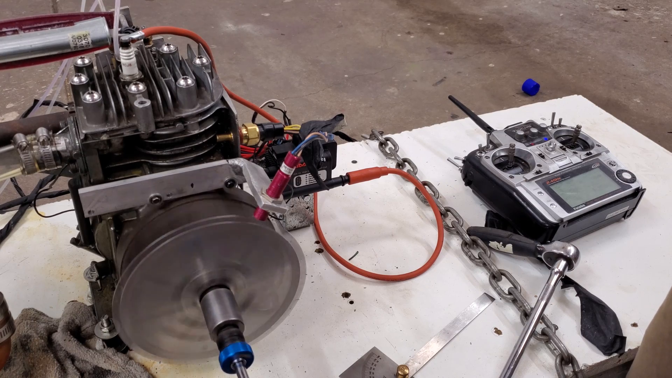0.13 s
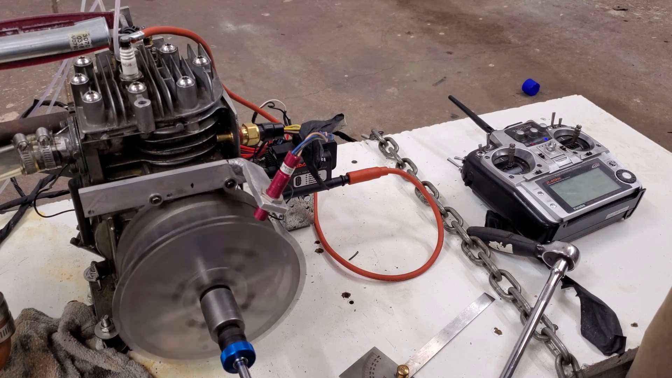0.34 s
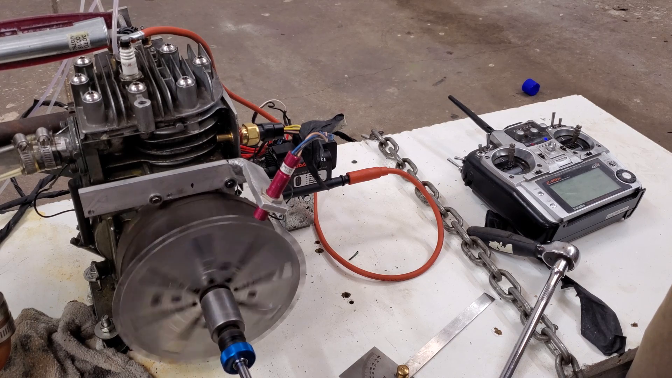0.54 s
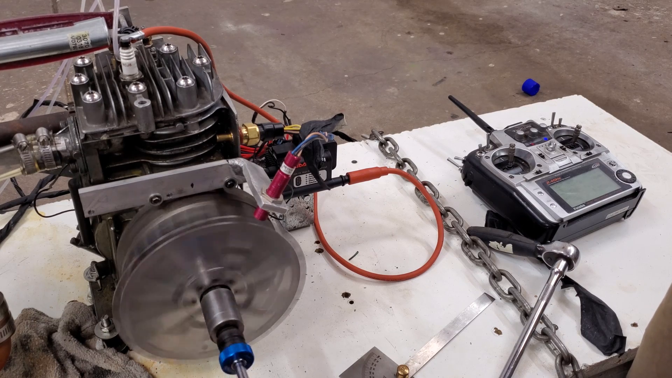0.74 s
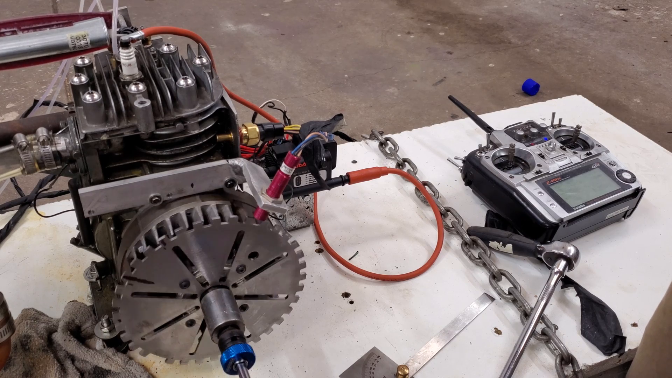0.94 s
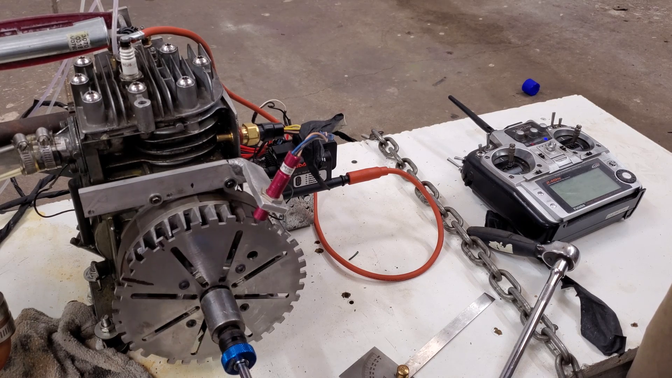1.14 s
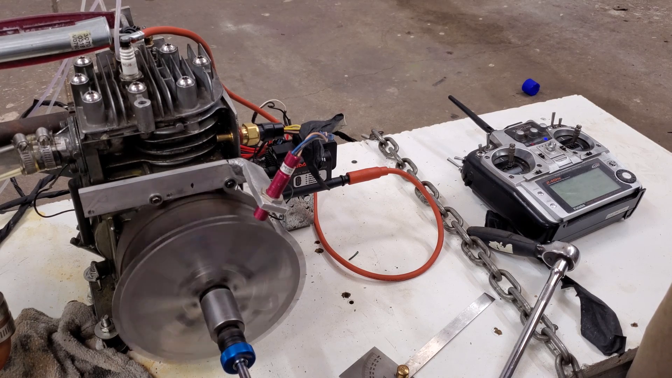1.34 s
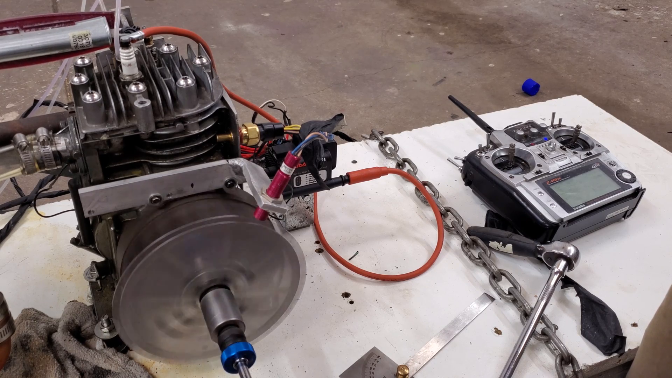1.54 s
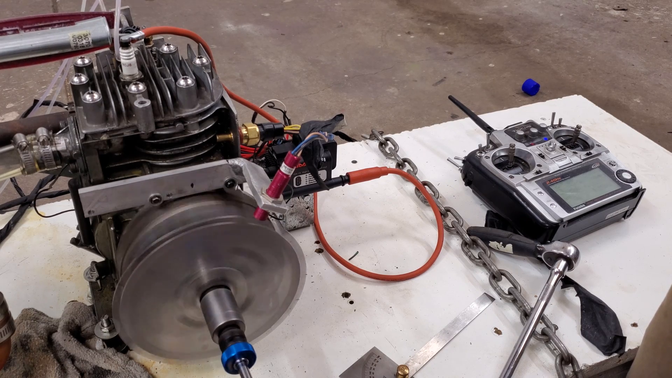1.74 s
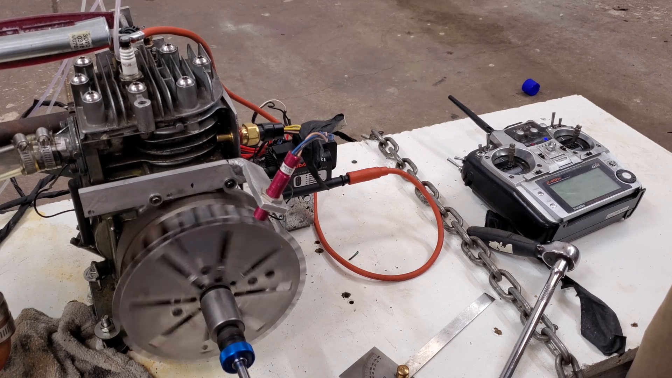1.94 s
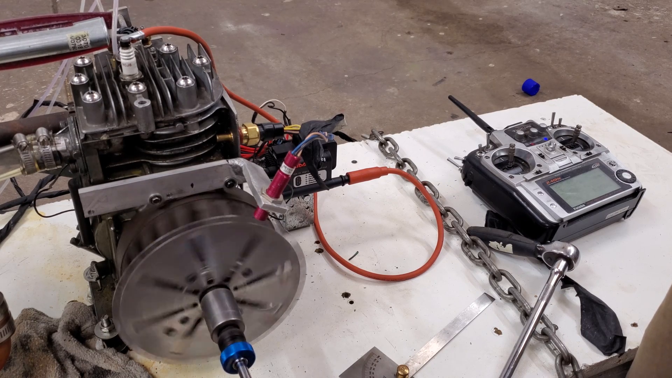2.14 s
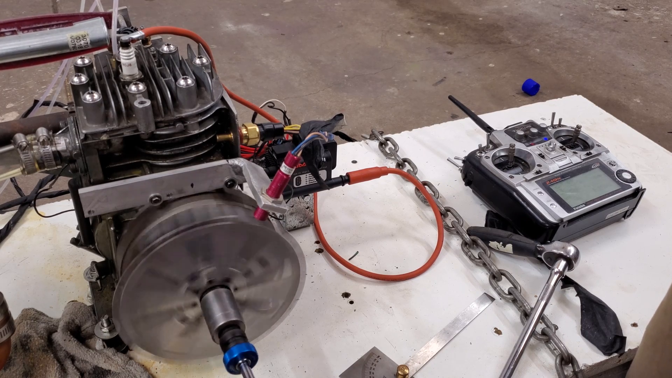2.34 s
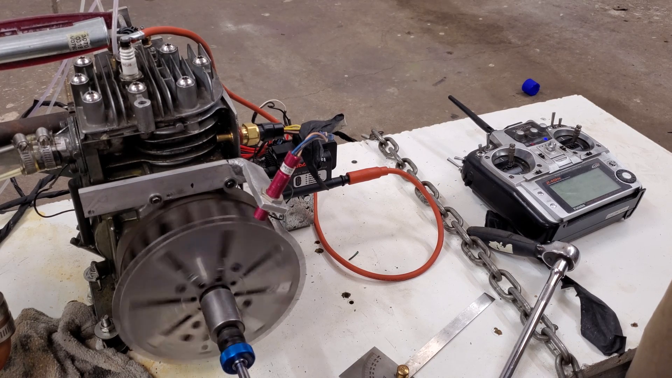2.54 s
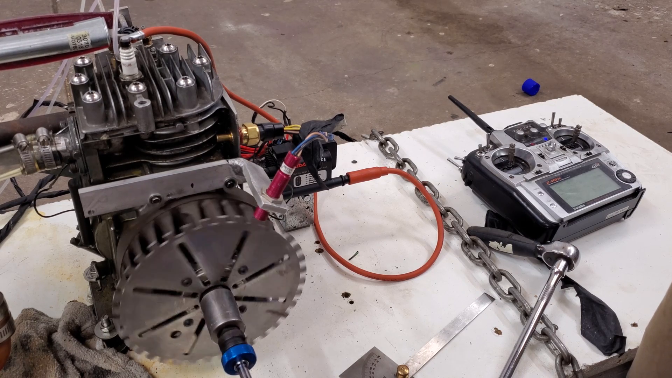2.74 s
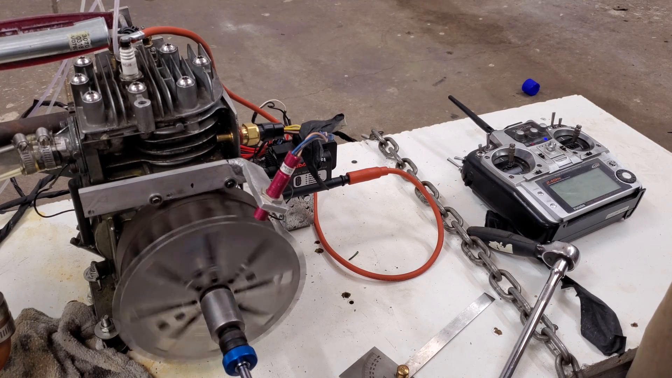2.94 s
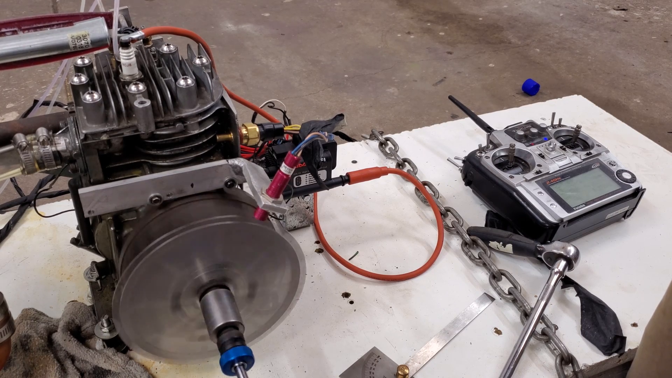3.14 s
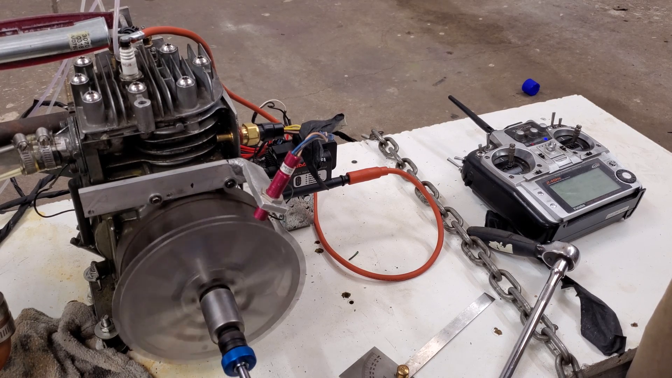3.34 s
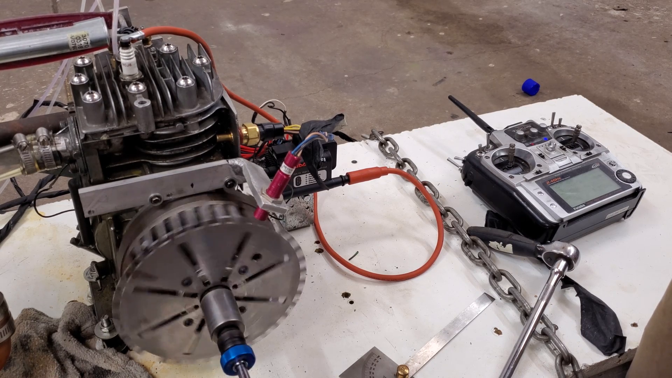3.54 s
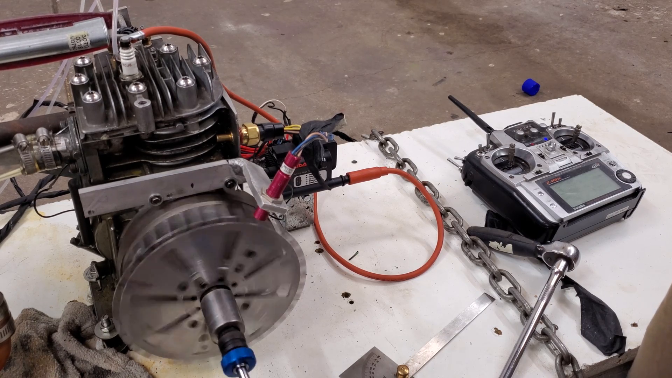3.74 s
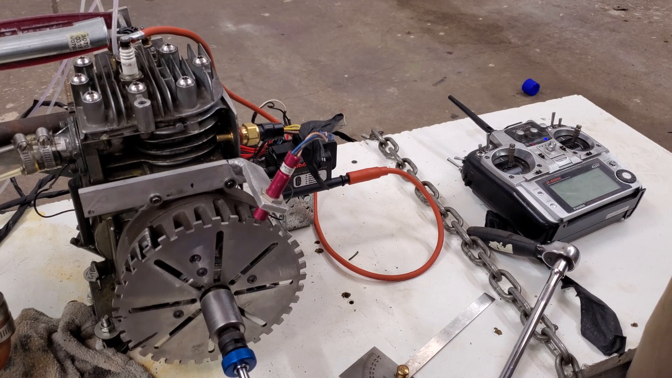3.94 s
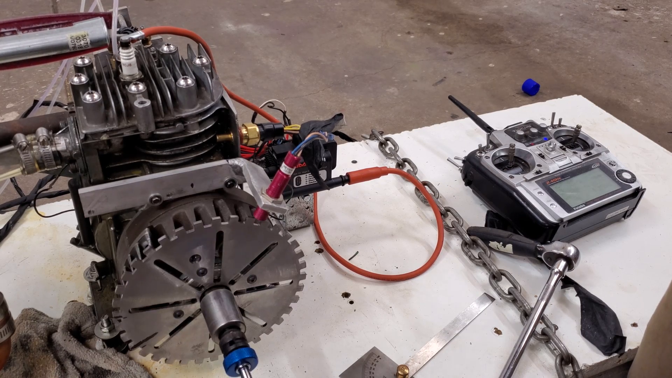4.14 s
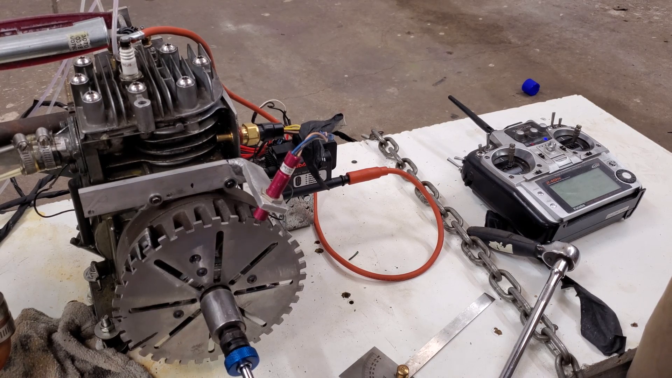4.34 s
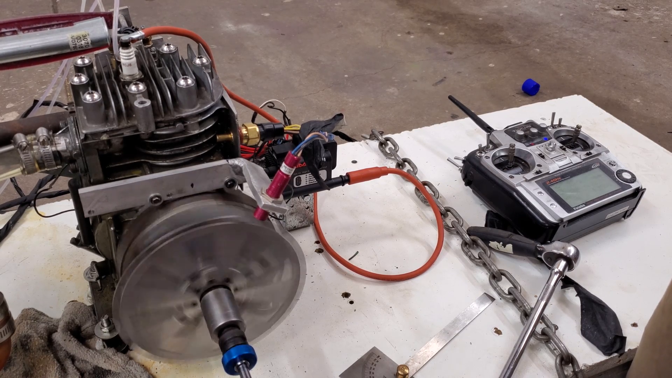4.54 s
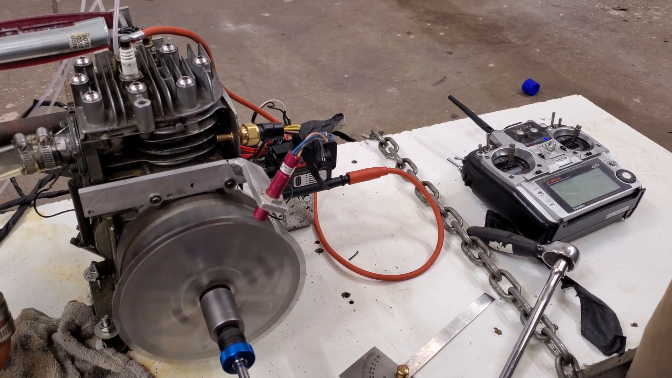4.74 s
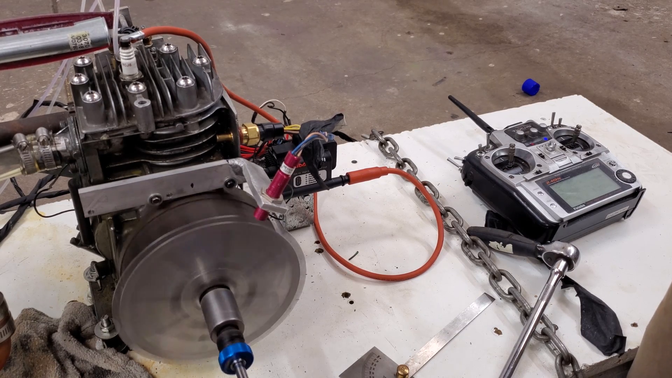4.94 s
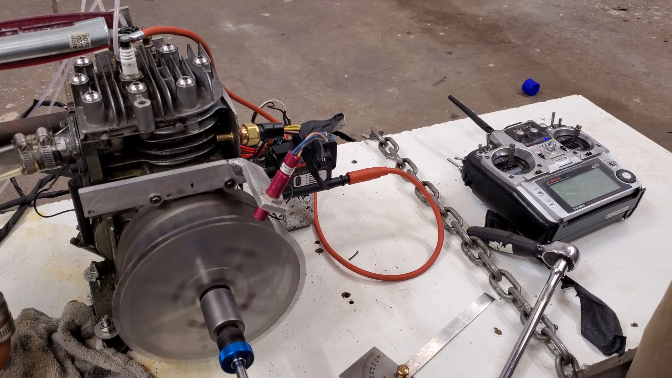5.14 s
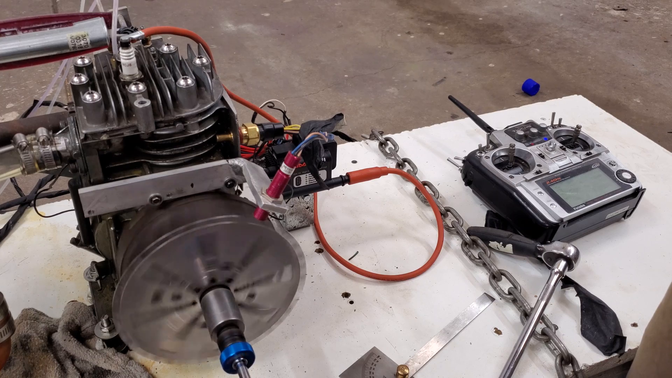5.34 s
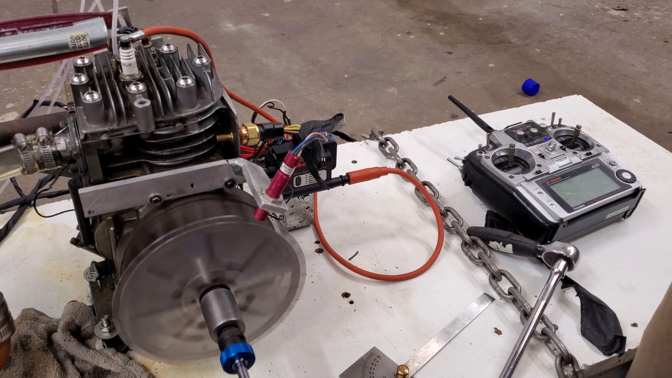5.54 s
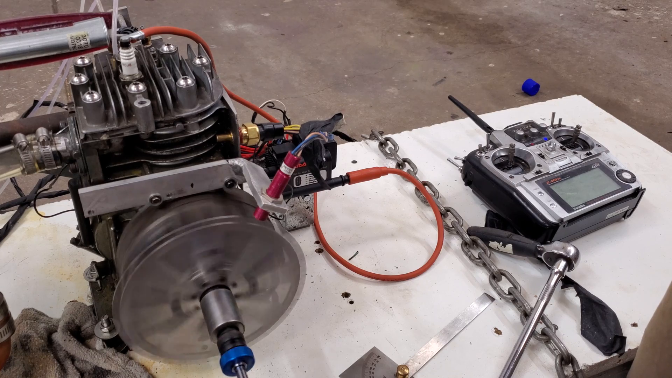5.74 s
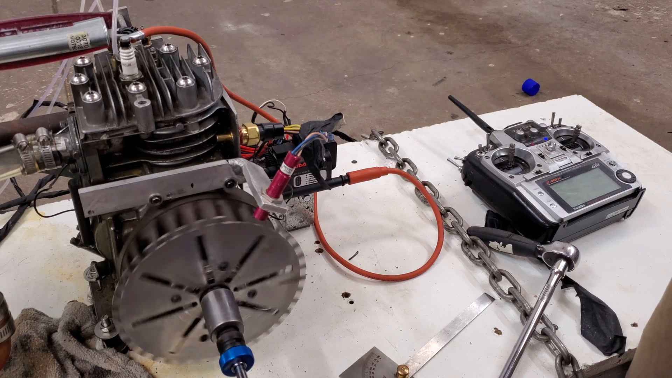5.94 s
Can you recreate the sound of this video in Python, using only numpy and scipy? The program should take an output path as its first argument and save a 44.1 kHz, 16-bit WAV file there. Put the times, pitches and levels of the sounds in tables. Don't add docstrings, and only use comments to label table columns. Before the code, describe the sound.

Close stereo phone recording in a workshop with slight room reverberation. A drill already grinding an engine slows with rattling and clacks, then three more pulls follow: a long hard one, a weaker one, a last hard one. Gears rasp, the motor whines, the piston thumps low, and loose metal ticks through each coast-down. The second and fourth bursts each hold one dull exhaust pop.

```python
import sys
import numpy as np
from scipy import signal
from scipy.fft import rfft, irfft, next_fast_len
from scipy.io import wavfile
from scipy.ndimage import uniform_filter1d, map_coordinates

SR = 44100
rng = np.random.default_rng(int(sys.argv[2]) if len(sys.argv) > 2 else 0)


def pcm_store(signal):
    levels = np.round(np.clip(np.atleast_2d(signal), -1, 1) * 32767)
    wavfile.write(sys.argv[1], SR, levels.astype(np.int16).T)


def gain_from_db(level_db):
    decades = np.asarray(level_db, float) / 20
    return 10 ** decades


N = 263718
T = np.arange(N) / SR


def unit(x):
    return x / np.sqrt(np.mean(x ** 2) + 1e-20)


def along(points, hz):
    point_hz, value = np.transpose(points)
    return np.interp(np.log(hz + 1), np.log(point_hz + 1), value)


def curves(rows):
    s, *columns = np.transpose(rows)
    return [np.interp(T, s, column) for column in columns]


def wobble(knots_per_s):
    coarse_s = T[::4]
    knots = rng.standard_normal(int(N * knots_per_s / SR) + 4)
    return unit(np.interp(T, coarse_s, map_coordinates(knots, [coarse_s * knots_per_s])))


def filtered(x, response):
    m = next_fast_len(N + SR // 8)
    return irfft(rfft(x, m) * response(np.fft.rfftfreq(m, 1 / SR)), m)[..., :N]


def resonance(f, centre_hz, width_hz):
    return 1j * f * width_hz / (centre_hz ** 2 - f * f + 1j * f * width_hz)


def modes(table):
    return lambda f: sum((-1) ** k * gain_from_db(db) * resonance(f, hz, width_hz)
                         for k, (hz, width_hz, db) in enumerate(table))


def pair(response, lumps_db):
    return unit(filtered(rng.standard_normal((2, N)) * gain_from_db(lumps_db), response))


def patchy(x, depth_db):
    z = signal.stft(x, nperseg=256)[2]
    field = uniform_filter1d(rng.standard_normal(z.shape[1:]), 4, 0)
    field = uniform_filter1d(field, 12, 1)
    return unit(signal.istft(z * gain_from_db(depth_db * unit(field)), nperseg=256)[1][:, :N])


def tone(rows, orders):
    hz, db = curves(rows)
    start_s, end_s = rows[0][0], rows[-1][0]
    on = np.interp(T, [start_s - .02, start_s, end_s, end_s + .02], [0, 1, 1, 0])
    phase = 2 * np.pi * np.cumsum(hz * (1 + .0025 * wobble(30))) / SR
    total = 0
    for multiple, level_db, flutter_db in orders:
        gain = np.sqrt(2) * gain_from_db(level_db + flutter_db * wobble(35))
        total = total + gain * np.sin(multiple * phase)
    return on * gain_from_db(db) * total


def glides(rows, rise_s):
    out = np.zeros(N + SR)
    for s, length_s, from_hz, to_hz, db in rows:
        t = np.arange(round((length_s + 3 * rise_s) * SR)) / SR
        hz = from_hz + (to_hz - from_hz) * np.clip(t / length_s, 0, 1)
        shape = np.clip(t / rise_s, 0, 1) * np.exp(-np.clip(t - length_s, 0, None) / rise_s)
        sine = np.sin(2 * np.pi * np.cumsum(hz) / SR)
        out[round(s * SR):][:len(t)] += np.sqrt(2) * gain_from_db(db) * shape * sine
    return out[:N]


# (start_s, effort_db, airflow_over_effort_db)
BURSTS = [
    [(0.0, -25, -1.5), (0.27, -29, -0.5), (0.35, -31, 2), (0.41, -34, 0), (0.496, -41, 4), (0.57, -43, 4),
     (0.64, -49.5, 3), (0.7, -57.5, -1)],
    [(0.938, -34.5, -13), (1.114, -24.5, -4), (1.26, -21.5, -5.5), (1.382, -22, -6), (1.438, -28, -1),
     (1.754, -23.5, -1.5), (1.936, -31.5, 1), (2.116, -37.5, 1), (2.374, -37, -2.5), (2.405, -46, 0),
     (2.5, -57.5, -1)],
    [(2.653, -45.5, 3), (2.748, -27.5, -9.5), (2.972, -31.5, 1.5), (3.176, -27.5, -1.5), (3.38, -29.5, 0.5),
     (3.42, -32.5, -1.5), (3.604, -35, -3), (3.824, -44.5, -1), (3.92, -57, -4)],
    [(4.18, -32, -3.5), (4.33, -28, -6), (4.44, -22, -4), (4.61, -20, -7), (4.776, -31.5, 2.5),
     (4.902, -23, -2.5), (5.24, -27.5, 1), (5.31, -33.5, 0), (5.72, -35, 0.5), (5.755, -42, -0.5),
     (5.86, -52.5, -0.5)],
]
STOP_DB_PER_S = [190, 160, 150, 75]


def drive():
    brake_db_per_s2 = 207
    out = np.zeros((3, N))
    for burst, stop_db_per_s in zip(BURSTS, STOP_DB_PER_S):
        start_s, end_s = burst[0][0], burst[-1][0]
        effort_db, air_db = curves(burst)
        late_s = (T - end_s).clip(0)
        effort_db = effort_db - (stop_db_per_s + brake_db_per_s2 * late_s) * late_s
        since_s = T - start_s + (start_s < .01)
        out = np.where(T >= start_s, [effort_db, air_db, since_s], out)
    return out


# (start_s, peak_db)
JERKS = [
    (0.372, -27.5),
    (0.949, -32),
    (2.664, -30.5),
    (4.184, -34.5),
]
# (from_s, to_s)
PULLING = [
    (-.1, 0.29),
    (1.17, 1.88),
    (2.9, 3.35),
    (4.42, 5.28),
]
# (centre_hz, width_hz, level_db)
HOUSING = [(2330, 800, 1.5), (3186, 353, 3), (4280, 330, -4), (1720, 810, -9.5), (6200, 890, -10.5)]
# (centre_hz, width_hz, level_db)
COGS = [(1977, 67, -19), (2194, 52, -17.5), (2357, 170, -8.5), (2544, 110, -13.5), (2970, 160, -8),
        (3224, 140, -13.5), (3486, 170, -7.5), (4480, 140, -17.5)]
# (centre_hz, width_hz, level_db)
CHUCK = [(680, 171, 3.5), (920, 180, 0.5), (1483, 183, -2), (410, 460, -5.5)]
# (centre_hz, width_hz, level_db)
COVER = [(5800, 400, -5), (8150, 800, 1), (9900, 400, -4), (11000, 450, -4), (12800, 400, -3),
         (14600, 400, -9)]
# (freq_hz, density_db)
FAN = [(2350, -19.5), (4000, -7), (4560, -7.5), (4830, -3.5), (6250, -3.5), (7250, -7.5), (8130, -3),
       (8370, -1.5), (8710, -4), (9270, -7.5), (11900, -8), (13100, -7.5), (15700, -13)]
# (centre_hz, width_hz, level_db)
STEEL = [(8220, 310, 0), (7860, 450, -4)]
# (start_s, shift_hz, level_db)
STEEL_LOAD = [(1.1, -100, 4), (1.2, 60, -5), (1.31, 0, 5), (1.42, 40, -8), (1.54, 79.5, 2),
              (1.66, -29.5, -0.5), (1.77, 59.5, 1), (1.9, 80, 0.5), (4.46, -150, 0.5), (4.61, -170, 1.5),
              (4.7, -39.5, -3.5), (5.12, -19.5, 2), (5.27, 79, -13)]


def gears():
    effort_db, air_db, since_s = drive()
    jerk_db_per_s = 503.5
    jerk = sum(gain_from_db(db - jerk_db_per_s * np.abs(T - s)) * (since_s < T - s + .016) for s, db in JERKS)
    pulled = uniform_filter1d(sum(1. * (T > a) * (T < b) for a, b in PULLING), size=5000)
    free = 1 - pulled
    fan_db = effort_db + air_db
    chatter_db = 0.38 * wobble(30) + 0.5 * wobble(70) + 0.84 * wobble(400) + 2.34 * wobble(3000)

    shell_lumps_db = chatter_db + 0.42 * wobble(17) + 2.5 * (1 - .6 * pulled) * wobble(80)
    housing = pair(modes(HOUSING), shell_lumps_db)
    impacts = rng.standard_normal((2, N)) * gain_from_db(chatter_db)
    struck = filtered(impacts, lambda f: np.array([[resonance(f, hz, width_hz)] for hz, width_hz, _ in COGS]))
    for (_, _, db), cog in zip(COGS, struck):
        housing = housing + gain_from_db(db) * unit(cog * gain_from_db(3 * wobble(30)))
    housing = (gain_from_db(effort_db) + jerk) * gain_from_db(-4) * housing

    growl = gain_from_db(-37 + 0.79 * (effort_db + 30) + 0.02 * air_db) + jerk
    chuck = pair(lambda f: modes(CHUCK)(f) * f / (f + 300), chatter_db + 1.37 * wobble(14))
    chuck = growl * gain_from_db(-3.0 + 0.5 * pulled) * chuck

    cover = patchy(pair(modes(COVER), chatter_db + 2.2 * wobble(120)), depth_db=3.0)
    cover = gain_from_db(fan_db - 2.5) * free * cover

    rattle_db = free * wobble(79)
    rush = pair(lambda f: gain_from_db(along(FAN, f)), 0.73 * chatter_db + 0.64 * wobble(40) + rattle_db)
    fan = gain_from_db(fan_db + 1.0 - 4 * free) * patchy(rush, depth_db=1.0)

    steel = gain_from_db(fan_db - 16 * free - 3) * pair(lambda f: modes(STEEL)(f) ** 2, 2.2 * wobble(60))
    shift_hz, load_db = curves(STEEL_LOAD)
    analytic = signal.hilbert(steel, next_fast_len(N))[:, :N]
    steel = gain_from_db(load_db) * np.real(analytic * np.exp(2j * np.pi * np.cumsum(shift_hz) / SR))
    return housing + chuck + fan + steel + cover


# (start_s, turns_hz, hum_db)
HUM_A = [(0.0, 305, -32), (0.046, 319, -32), (0.156, 271.5, -44), (0.168, 273.3, -37), (0.36, 225.6, -54.5)]
HUM_B = [(1.079, 193.1, -54), (1.296, 271.6, -41), (1.358, 283.8, -46), (1.442, 275.7, -34.5),
         (1.505, 305, -35), (1.7, 347.0, -34.5), (1.86, 307.4, -33), (1.97, 254.3, -51.5),
         (2.029, 255, -50)]
HUM_C = [(2.73, 205, -63), (2.818, 309, -40.5), (2.92, 241.3, -64), (2.982, 278.8, -46.5),
         (3.08, 304.7, -33.5), (3.356, 235.8, -49), (3.4, 250, -45.5), (3.44, 257, -38.5)]
HUM_D = [(4.48, 245.3, -62), (4.535, 264.7, -35), (4.621, 299.3, -46), (4.698, 278.7, -34),
         (4.797, 317, -36), (5.049, 361.6, -33.5), (5.264, 301.3, -38), (5.362, 284, -58)]
# multiple, level_db, flutter_db
SECOND = (2, -14, 3.5)
THIRD = (3, -21, 4)
# (start_s, pitch_hz, level_db)
WHINE_A = [(1.13, 690, -44), (1.18, 765, -36), (1.23, 830, -33), (1.306, 925, -34), (1.36, 968, -33),
           (1.394, 870, -31), (1.425, 800, -44)]
WHINE_B = [(4.39, 743, -43), (4.479, 848, -29), (4.531, 900, -36), (4.588, 965, -36.5), (4.634, 988, -42),
           (4.664, 862, -27.5), (4.69, 800, -58)]
# (start_s, length_s, from_hz, to_hz, level_db)
SQUEALS = [(.96, .085, 760, 1050, -39), (1, .04, 1900, 2080, -40), (1.375, .03, 2550, 2250, -31),
           (4.2, .05, 1900, 2050, -38), (1.375, .035, 5200, 4600, -30), (1.77, .15, 6700, 5850, -37),
           (1.94, .02, 3500, 2950, -32), (2.682, .035, 880, 825, -38), (2.79, .07, 990, 880, -43),
           (5.83, .1, 1530, 1500, -62), (2.752, .026, 1430, 1530, -35), (2.835, .028, 3500, 3170, -30),
           (4.2, .045, 900, 990, -35), (4.62, .018, 2080, 1920, -28), (4.635, .022, 5250, 4780, -27),
           (5.28, .018, 4300, 3600, -35), (1.17, .1, 4130, 4580, -35), (1.36, .04, 1450, 1290, -36),
           (4.57, .06, 1430, 1460, -39), (4.27, .06, 3930, 4070, -36), (5.71, .015, 950, 780, -36),
           (1.52, .18, 12400, 13900, -40), (1.72, .13, 13900, 12500, -42), (4.74, .13, 12400, 13400, -43),
           (1.5, .06, 6050, 6400, -39), (2.96, .12, 820, 950, -46), (3.1, .22, 940, 740, -44)]


def motor():
    hum = sum(tone(rows, [(1, 0, 1), SECOND, THIRD]) for rows in (HUM_A, HUM_B, HUM_C, HUM_D))
    whine = sum(tone(rows, [(1, 0, 1.5)]) for rows in (WHINE_A, WHINE_B))
    squeals = glides(SQUEALS, rise_s=.006) * gain_from_db(2.2 * wobble(150))
    return hum + whine + squeals


# (start_s, buzz_over_steady_db, rumble_over_steady_db)
SHUDDERS = [(0.59, 11, 6), (0.83, -14, 6.5), (1.45, 9.5, 2), (1.82, -15, -1), (2.01, 9.5, 6),
            (2.22, -9.5, 0), (2.42, -0.5, -2), (2.88, 5.5, 2), (3.451, 14.5, 4), (3.78, -12, -3),
            (4.02, 10, 9), (4.31, 7.5, -2), (4.711, 10.5, 8), (5.13, -11, -16), (5.33, 7.5, 9),
            (5.85, -8, -1)]
# (start_s, peak_db)
ROCKS = [(0.369, -21), (0.579, -41), (1.944, -23), (1.998, -24.5), (2.38, -28.5), (2.657, -34.5),
         (3.413, -25), (3.4545, -21), (3.518, -28), (4.18, -30), (5.291, -28), (5.326, -21.5),
         (5.715, -29.5)]
# (centre_hz, width_hz, level_db)
TABLE_TOP = [(200, 49, -0.5), (257, 22.7, 4), (316.3, 35, 1.5)]
# (freq_hz, density_db)
RUMBLE = [(25, -27), (45, 2), (65, 9), (100, -12.5), (140, -14.5), (200, -51.5)]


def bench():
    effort_db, _, since_s = drive()
    knee_db, shudder_s, flywheel_s = -39.5, 0.16, 0.32
    fading_db = (effort_db - knee_db).clip(None, 0)
    swells_db = sum(np.outer(db, (1 - np.abs(T - s) / shudder_s).clip(0)) for s, *db in SHUDDERS)
    buzz_db = -44 + 0.78 * fading_db + swells_db[0]
    spin_up_db = -15.5 * (1 - since_s / flywheel_s).clip(0)
    rumble_db = -52 + 0.43 * fading_db + swells_db[1] + spin_up_db
    buzz = gain_from_db(buzz_db - 3.5) * pair(lambda f: modes(TABLE_TOP)(f) ** 2, 1.5 * wobble(25))
    rumble = gain_from_db(rumble_db - 2.0) * pair(lambda f: gain_from_db(along(RUMBLE, f)), 2.9 * wobble(8.8))
    jolts = 0
    for s, db in ROCKS:
        decay = gain_from_db(db - 7.5 - 60 * (T - s).clip(0) / 0.13)
        jolts = jolts + decay * ((T - s) / 0.0043).clip(0, 1)
    boom = jolts * pair(modes([(276, 78, -1.5), (453, 124, -4.5), (800, 370, -11.5)]), 0)
    return buzz + boom + rumble


# (freq_hz, density_db)
QUIET = [(30, 0.5), (60, 1.5), (110, 5), (160, -5.5), (250, -10.5), (400, -18), (900, -41.5), (2000, -40),
         (7000, -45), (12000, -59), (16000, -72)]
# (pitch_hz, level_db)
BUZZ = [(1941, -89), (6805, -92), (11489, -96)]


def workshop():
    lines = sum(np.sqrt(2) * gain_from_db(db) * np.sin(2 * np.pi * hz * T) for hz, db in BUZZ) * (T < 2)
    return gain_from_db(-70.5) * pair(lambda f: gain_from_db(along(QUIET, f)), 0) + lines


# (start_s, peak_db, pitch_hz)
THUMPS = [(0.074, -33.5, 76.4), (0.178, -37.5, 78.4), (0.489, -38, 79), (0.571, -40.5, 83),
          (1.14, -26, 86.4), (1.367, -32, 72.7), (1.441, -21.5, 93.5), (1.646, -32.5, 72.5),
          (1.737, -32, 64), (1.95, -39, 55.94), (2.021, -33, 80), (2.123, -36, 70), (2.229, -49.5, 59.2),
          (2.81, -41, 75), (2.923, -29.5, 91), (3.418, -33, 76), (3.481, -28.5, 82), (3.547, -38, 67),
          (4.258, -40, 73), (4.405, -26, 93.3), (4.629, -33, 73), (4.701, -19.5, 91.5), (4.891, -34.5, 75),
          (5.0, -36, 72.4), (5.271, -44, 99), (5.369, -33.5, 67.7), (5.462, -37, 75), (5.699, -56, 56.1)]
# (start_s, length_s, from_hz, to_hz, level_db)
POPS = [
    (1.462, 0.035, 141.4, 150, -25),
    (4.72, 0.046, 131, 160, -27),
]


def engine():
    out = np.zeros(N + SR)
    t = np.arange(SR // 5) / SR
    for s, db, hz in THUMPS:
        shape = gain_from_db(db + 2.5 - 60 * t / 0.14) * (1 - np.exp(-t / 0.0048))
        out[round(s * SR):][:len(t)] += shape * np.sin(2 * np.pi * hz * t)
    return out[:N] + glides(POPS, rise_s=0.018)


# (freq_hz, t60_s)
WALLS = [(200, 0.34), (2000, 0.32), (12000, 0.054)]


def walls(x):
    hz, t, z = signal.stft(rng.standard_normal((2, SR // 2)), SR, nperseg=256)
    decay = gain_from_db(-60 * t / along(WALLS, hz)[:, None])
    tail = signal.istft(z * decay, SR, nperseg=256)[1]
    return signal.fftconvolve(x[None], tail / np.linalg.norm(tail[0]), axes=1)[:, :N]


# (start_s, peak_db)
CLICKS = [(0.5675, -11), (0.585, -7), (0.737, -33.5), (0.7562, -55), (1.9058, -2), (2.3125, -7.5),
          (2.3634, -8.5), (2.4645, -15), (2.556, -36), (3.373, -6), (3.473, -7), (3.5333, -4),
          (3.6057, -8.5), (3.7539, -16.5), (3.9466, -18), (3.9742, -29), (4.0003, -21.5), (4.1446, -36.5),
          (4.3665, -6), (5.192, -2.5), (5.2424, -6.5), (5.3702, -10), (5.63, -16), (5.6568, -8.5),
          (5.78, -18), (5.9232, -18), (5.9452, -26), (5.9556, -20)]
# (start_s, peak_db)
CLACKS = [(0.3544, -9), (0.4566, -17), (0.5112, -12.5), (0.5412, -10), (0.6332, -22), (0.9392, -17.5),
          (1.5856, -20.5), (1.9294, -11), (2.5162, -35), (2.653, -28.5), (2.659, -21.5), (2.671, -27.5),
          (4.17, -23), (5.2714, -11.5), (5.7052, -11)]
# (start_s, peak_db)
KNOCKS = [(0.5744, -20.5), (0.911, -53), (0.9234, -16.5), (0.92, -42), (2.623, -61), (2.6385, -40),
          (3.3893, -18), (3.4562, -16.5), (4.1532, -26), (5.5926, -20.5)]
# (start_s, peak_db)
TINKLES = [(.301, -6), (.323, -6), (.622, -18), (.637, -28), (.659, -25), (.674, -23), (.687, -24),
           (.694, -26), (.962, -18), (1.965, -10), (2.038, -13), (2.074, -23), (2.268, -13), (2.288, -17),
           (2.301, -14), (2.35, -12), (2.439, -25), (2.541, -36), (2.709, -22), (2.877, -17), (2.906, -8),
           (3.355, -1), (3.389, -9), (3.446, -17), (3.486, -8), (3.519, -7), (3.554, -18), (3.574, -17),
           (3.582, -17), (3.593, -16), (3.613, -23), (3.636, -19), (3.696, -17), (3.961, -41), (3.994, -37),
           (4.009, -36.5), (4.171, -28), (4.188, -12), (4.239, -19), (4.262, -15), (4.312, -16),
           (4.751, -10), (4.757, -16), (5.138, -7), (5.173, -15), (5.27, -13), (5.312, -10), (5.318, -8),
           (5.849, -37), (5.883, -38), (5.903, -38), (5.962, -31)]
# (start_s, peak_db)
TAPS = [(.371, -21), (.431, -32), (.525, -33), (.531, -29), (.633, -34.5), (1.952, -18.5), (2.059, -25),
        (2.104, -22.5), (2.254, -39), (2.481, -47), (3.477, -24), (3.561, -26.5), (3.583, -32),
        (4.838, -25), (4.892, -26), (5.325, -25.5), (5.344, -33), (5.6, -31), (5.691, -37), (5.82, -34),
        (5.856, -33), (5.909, -44)]
# (centre_hz, width_hz, level_db)
TAPPET = [(5820, 460, -1.5), (8580, 840, 3), (10420, 1100, -1), (11460, 770, -1.5), (13600, 820, -3),
          (15200, 700, -3)]


def ticks():
    sorts = [  # rows, low_share_db, t60_s, rise_s, walls_db
        (CLICKS, -29, 0.018, 0.0003, -17),
        (CLACKS, -2.2, 0.051, 0.0015, -19.5),
        (KNOCKS, 9.1, 0.012, 0.0015, -15),
        (TINKLES, -30, 0.015, .0004, -16.5),
        (TAPS, 14, 0.0085, 0.00077, -22.5)]
    bright, dull = np.zeros((2, 2, N + SR))
    t = np.arange(SR // 8) / SR
    for rows, low_db, t60_s, rise_s, walls_db in sorts:
        crack = np.clip(t / rise_s, 0, 1) * gain_from_db(-60 * t / t60_s)
        shape = crack + gain_from_db(walls_db - 60 * t / 0.19)
        shape = shape * (1 + 0.3 * gain_from_db(-60 * np.abs(t - rise_s) / 0.0048))
        for s, db in rows:
            noise = rng.standard_normal((2, len(t)))
            hit = shape * noise / np.std(noise[0, :SR // 250])
            span = slice(round(s * SR), round(s * SR) + len(t))
            bright[:, span] += gain_from_db(db - 5.5) * hit
            dull[:, span] += gain_from_db(db + low_db - 7.5) * hit
    high = filtered(bright[:, :N], lambda f: (modes(TAPPET)(f) + 0.2) * (1j * f / (6500 + 1j * f)) ** 2)
    low = signal.sosfilt(signal.butter(2, [450, 4200], "band", fs=SR, output="sos"), dull)
    return high + low[:, :N]


# (start_s, peak_db)
SNAPS = [(.9237, -13), (.9467, -11), (.9484, -18), (.955, -16), (2.6415, -24), (2.656, -19), (2.6628, -19),
         (2.665, -17), (2.6707, -17), (3.4567, -12), (3.478, -21), (4.181, -15), (4.1868, -20),
         (.5765, -19), (.3715, -16), (.5125, -20), (.634, -29)]
# (centre_hz, width_hz, level_db)
CASE = [(880, 350, 0), (2270, 560, 3), (3500, 600, -3)]


def snaps():
    blows = np.zeros(N)
    for s, db in SNAPS:
        blows[round(s * SR)] = gain_from_db(db + 17)
    return filtered(blows, modes(CASE)) * np.array([[1], [.4]])


# (start_s, length_s, from_hz, to_hz, level_db)
RINGS = [(1.08, 0.31, 4210, 4610, -37), (4.36, 0.23, 4200, 4720, -36.5), (1.17, .1, 2110, 2224, -32),
         (1.34, 0.017, 2905, 2895, -22.5), (1.575, 0.022, 2600, 3120, -23.5), (1.8, 0.055, 6370, 6320, -35),
         (2.05, 0.14, 2894, 2500, -41), (2.42, 0.1, 902, 883, -53.5), (2.86, 0.072, 3570, 3560, -34),
         (2.95, .44, 2512, 2384, -37), (2.7, 0.041, 903, 1100, -44), (2.815, 0.048, 1810, 1750, -38),
         (1.2, 0.21, 1660, 1950, -41), (4.24, 0.086, 1237, 1413, -39), (4.26, .08, 2480, 2800, -40),
         (3.0, 0.108, 3130, 3106, -33), (3.05, 0.347, 3510, 3450, -37.5), (3.66, 0.045, 2400, 2390, -41),
         (3.75, .14, 12800, 12800, -61), (4.33, 0.077, 3460, 3590, -34.5), (4.4, 0.045, 2090, 2056, -31),
         (4.44, 0.098, 3310, 3436, -27.5), (4.45, 0.055, 2300, 2300, -27.5), (4.47, .03, 1694, 1686, -28),
         (5.4, 0.104, 12900, 12800, -54), (5.41, 0.086, 3290, 3400, -42), (5.43, 0.11, 2683, 2470, -39),
         (5.52, .04, 14600, 14600, -44), (5.7, 0.061, 14700, 14700, -43), (5.94, .03, 14700, 14700, -60),
         (1.55, 0.27, 13260, 13600, -46)]


def rings():
    return sum(glides(RINGS[k::2], rise_s=.012) * [wobble(420), 0.57 * wobble(420)] for k in range(2))


# (freq_hz, correlation)
ALIKE = [(60, 0.96), (200, 1), (400, 0.89), (700, 0.94), (1400, 0.52), (3000, 0.55), (5000, 0.036),
         (8000, 0.5), (15000, 0.23)]
# (freq_hz, level_db)
LEAN = [(60, -1), (110, 1), (200, -0.5), (380, -2), (700, -1.0), (1290, -1.5), (2380, 0), (4400, -2.5),
        (8120, 0), (15000, 1)]
# (freq_hz, phase_rad)
LEAD = [(100, 0.084), (690, -0.57), (1290, -0.57), (1810, 0.22), (3100, -0.76), (5000, -1.25),
        (9000, -1.21)]


def scene():
    tones = motor() + engine()
    both = gears() + bench() + workshop() + ticks() + snaps() + rings()
    both = both + [tones, 0.19 * tones] + gain_from_db([[-14], [-6]]) * walls(tones)

    def spread(f):
        angle = np.arccos(np.clip(along(ALIKE, f), -1, 1)) / 2
        return np.array([np.cos(angle), np.sin(angle)])

    mid, side = np.sqrt(2) * filtered(both, spread)
    half = np.array([[.5], [-.5]])
    ports = np.array([mid + side, mid - side])
    return filtered(ports, lambda f: gain_from_db(along(LEAN, f) * half) * np.exp(1j * along(LEAD, f) * half))


def roll_off(x):
    return signal.sosfilt(signal.butter(12, 16830, fs=SR, output="sos"), x)


def record(dry):
    limited = dry / (1 + np.abs(dry / .62) ** 4) ** (1 / 4)
    top_hz = 15800
    band = lambda f: np.clip((top_hz - f) / 90, 0, 1) * f ** 3 / (f ** 3 + 40 ** 3)
    return roll_off(filtered(limited, band))


dry = scene()
out = record(dry)
pcm_store(out)
```